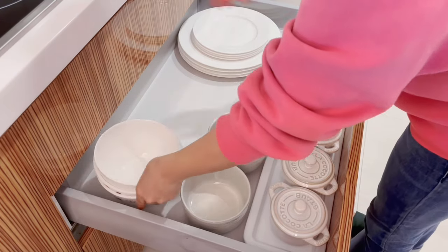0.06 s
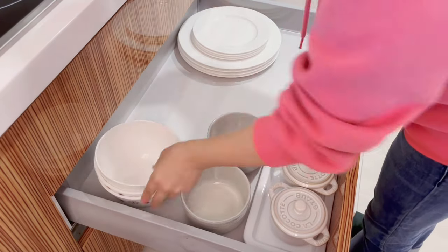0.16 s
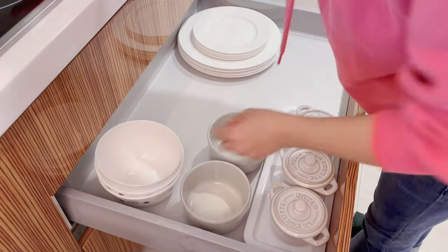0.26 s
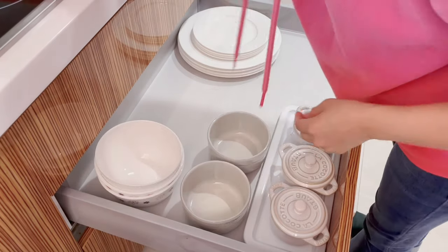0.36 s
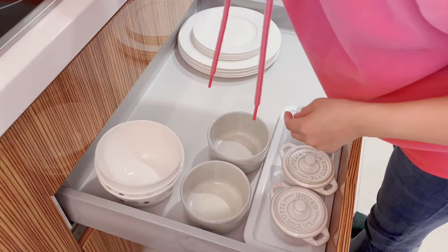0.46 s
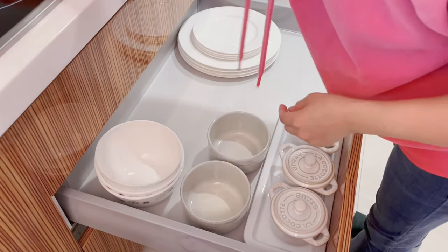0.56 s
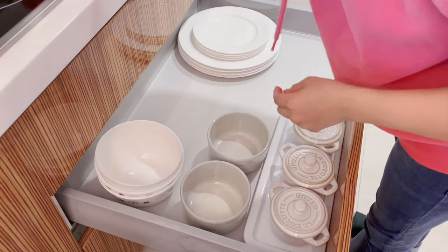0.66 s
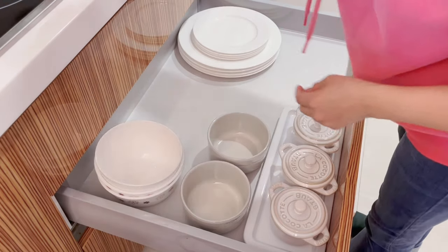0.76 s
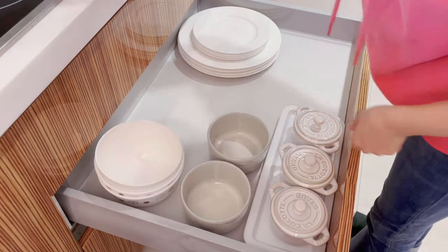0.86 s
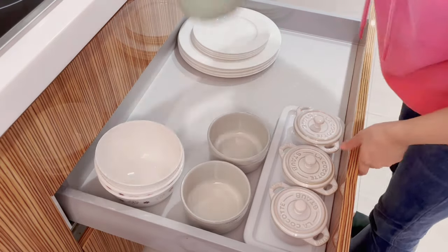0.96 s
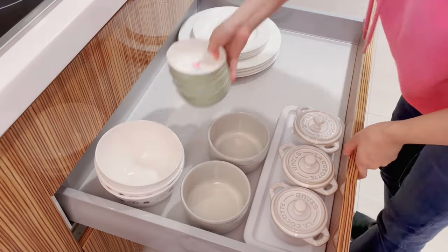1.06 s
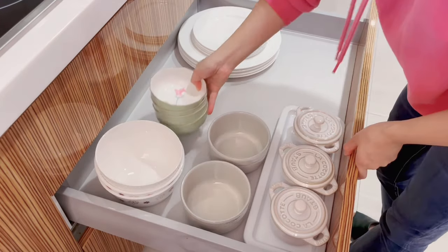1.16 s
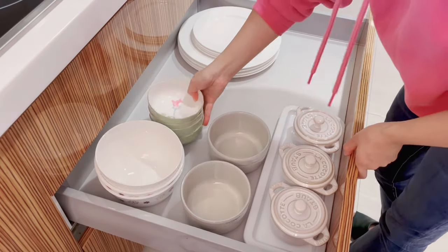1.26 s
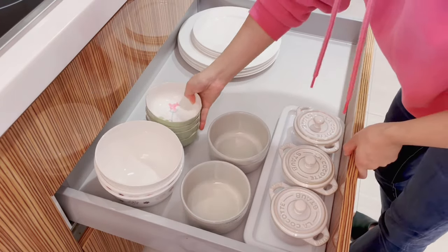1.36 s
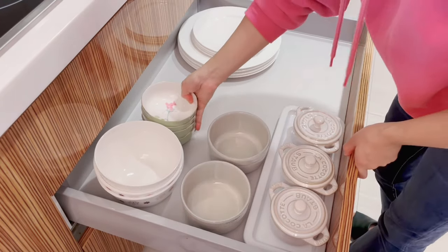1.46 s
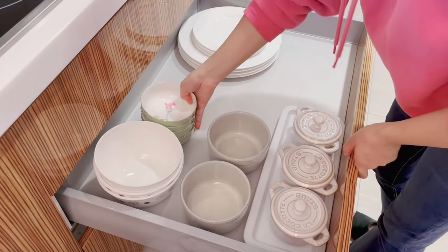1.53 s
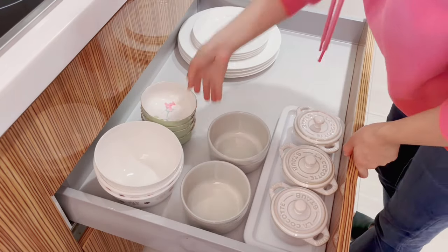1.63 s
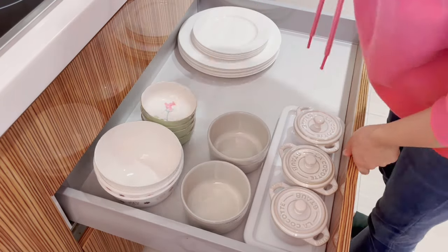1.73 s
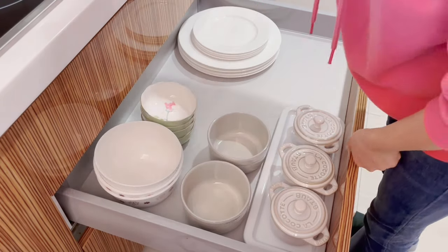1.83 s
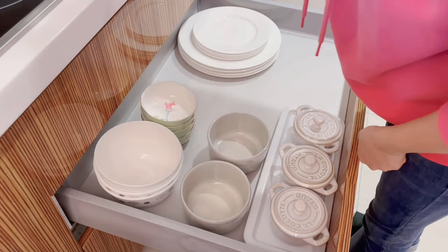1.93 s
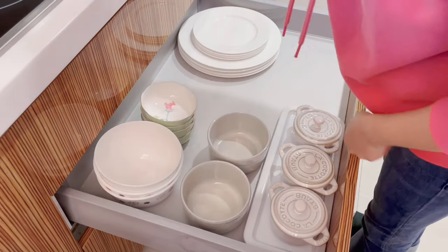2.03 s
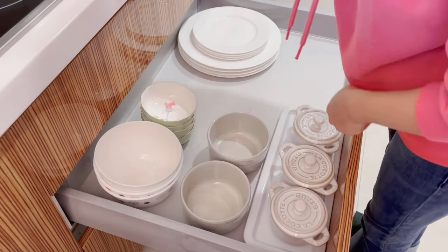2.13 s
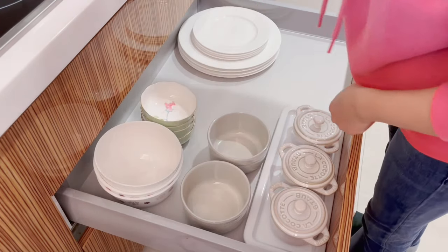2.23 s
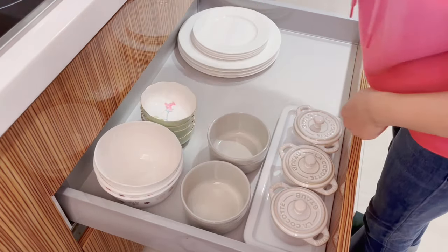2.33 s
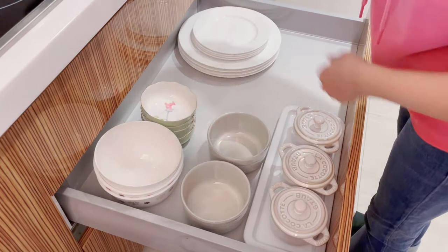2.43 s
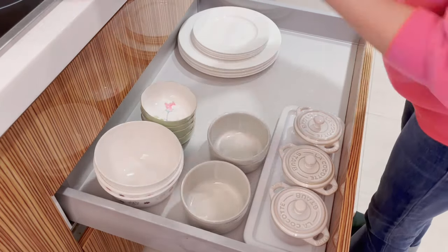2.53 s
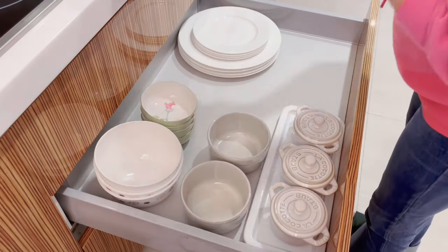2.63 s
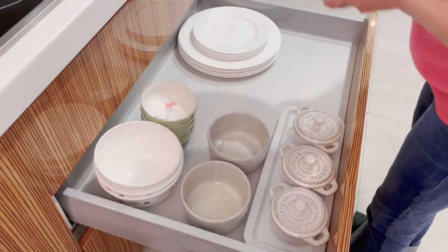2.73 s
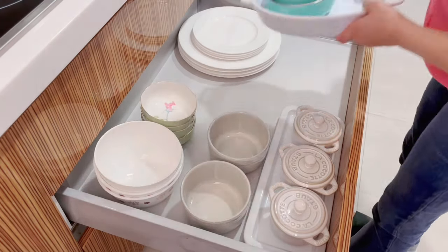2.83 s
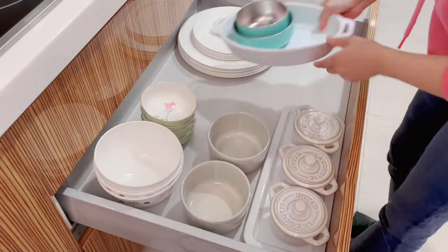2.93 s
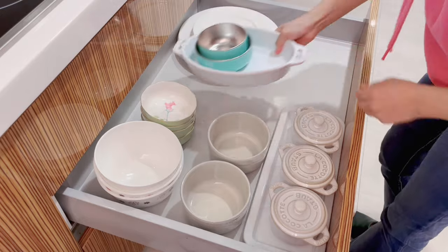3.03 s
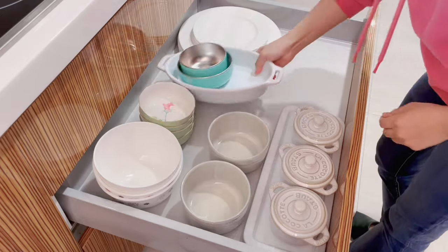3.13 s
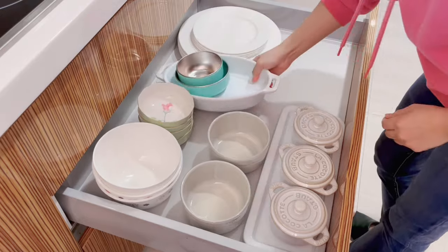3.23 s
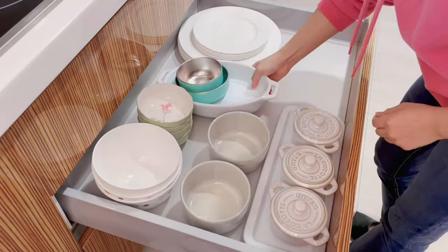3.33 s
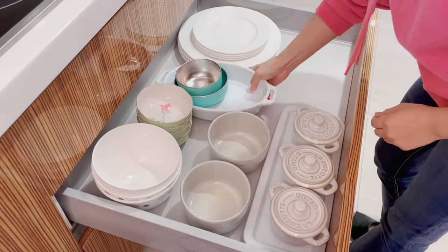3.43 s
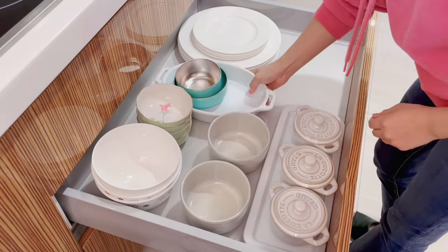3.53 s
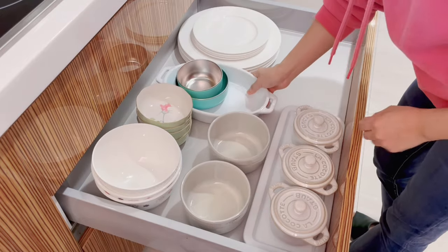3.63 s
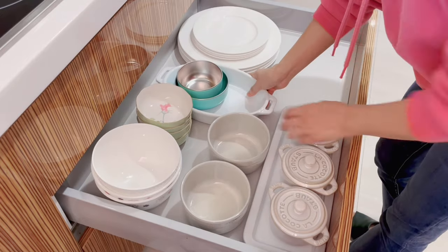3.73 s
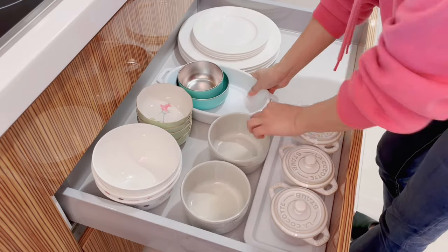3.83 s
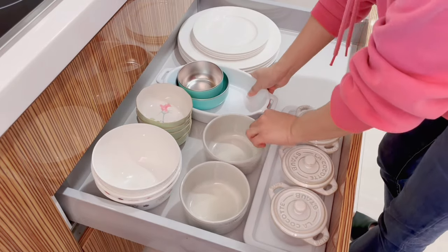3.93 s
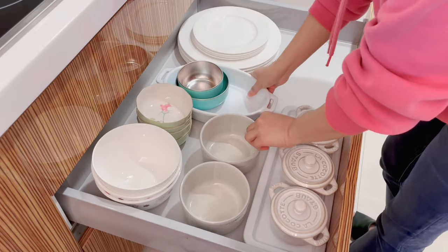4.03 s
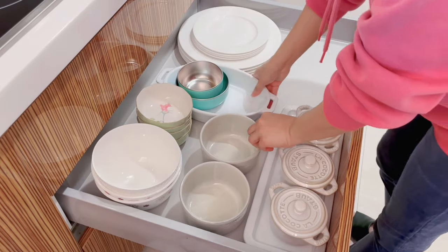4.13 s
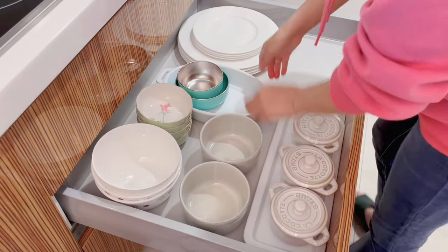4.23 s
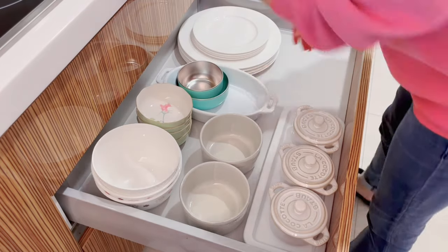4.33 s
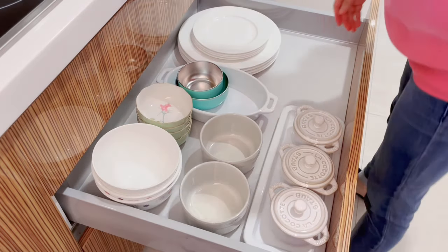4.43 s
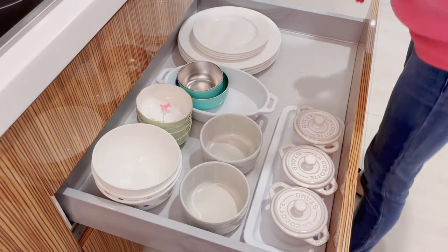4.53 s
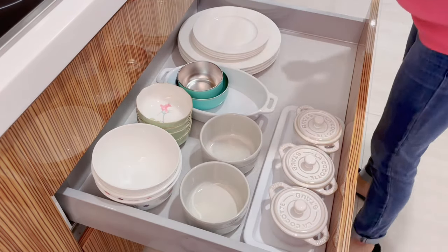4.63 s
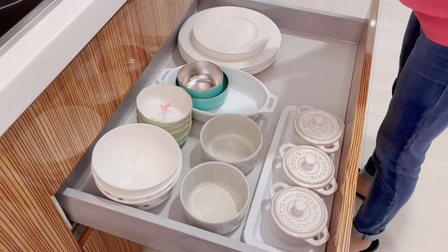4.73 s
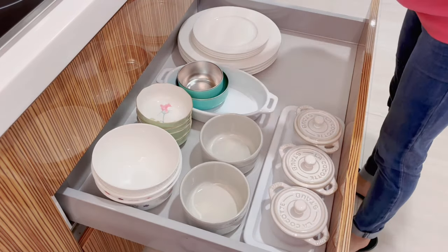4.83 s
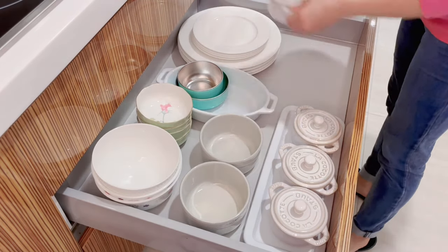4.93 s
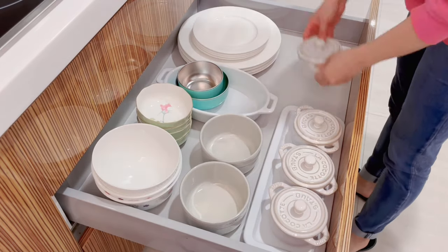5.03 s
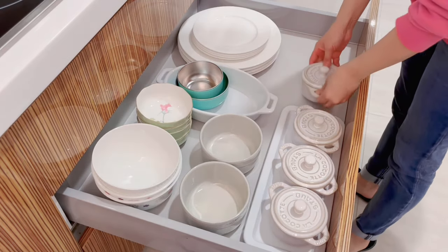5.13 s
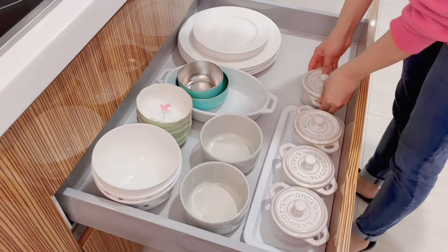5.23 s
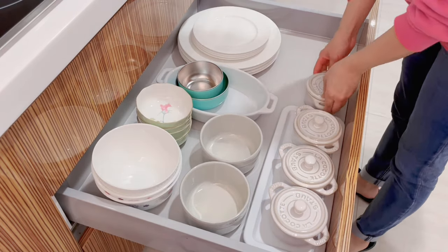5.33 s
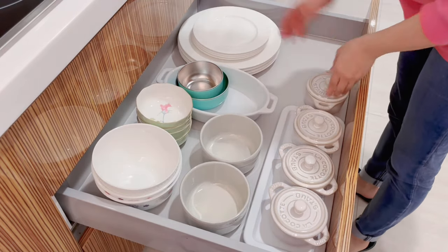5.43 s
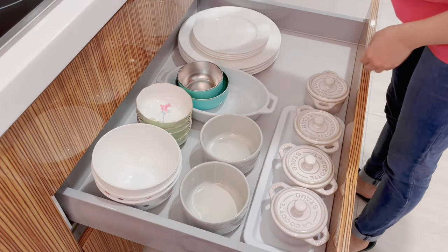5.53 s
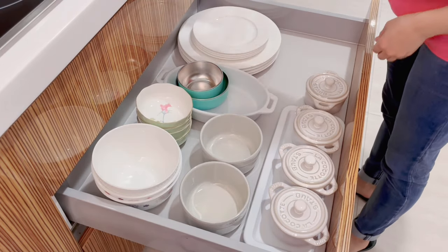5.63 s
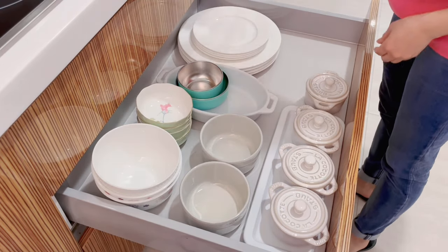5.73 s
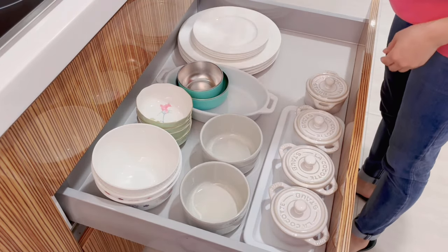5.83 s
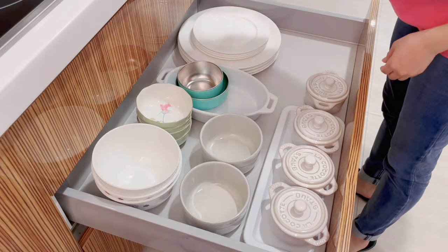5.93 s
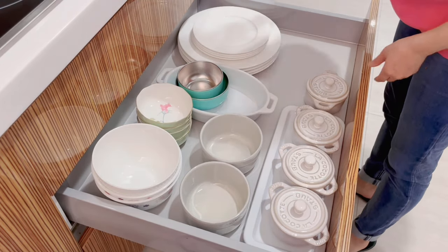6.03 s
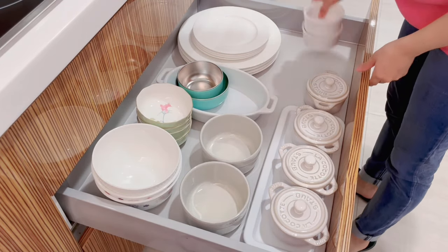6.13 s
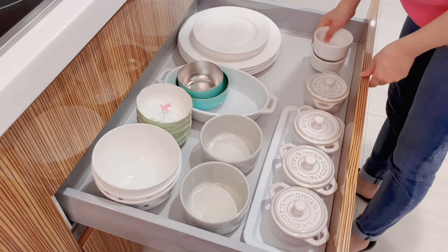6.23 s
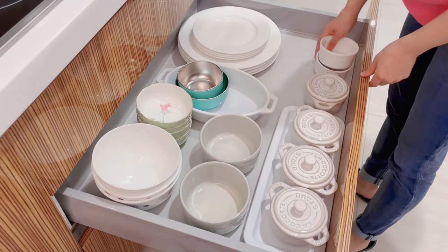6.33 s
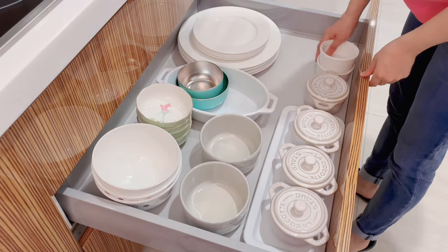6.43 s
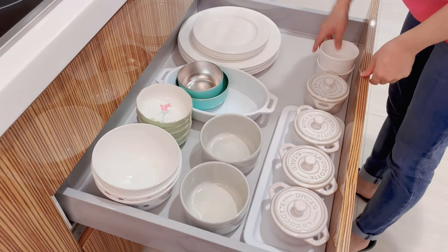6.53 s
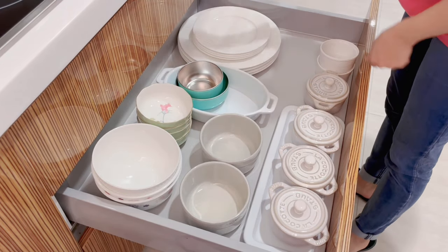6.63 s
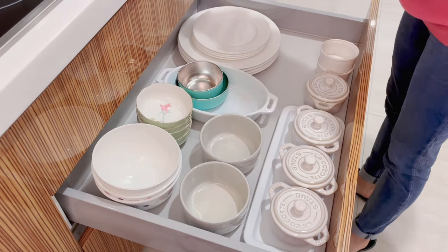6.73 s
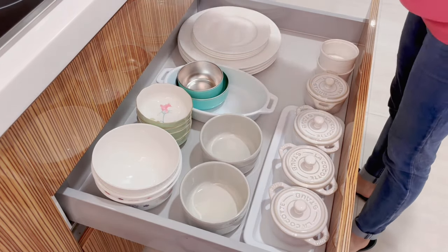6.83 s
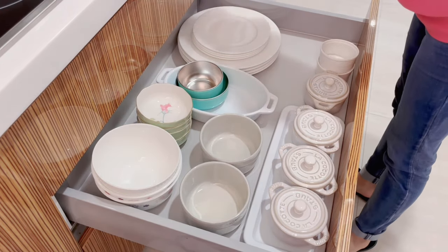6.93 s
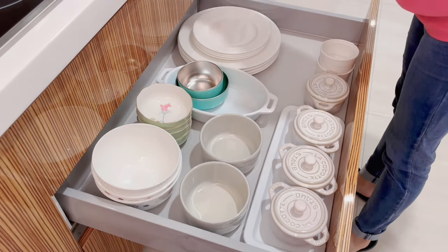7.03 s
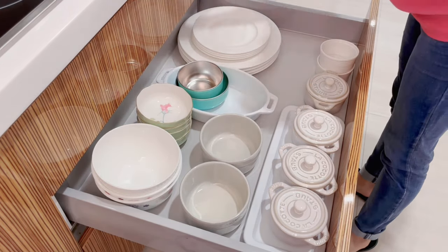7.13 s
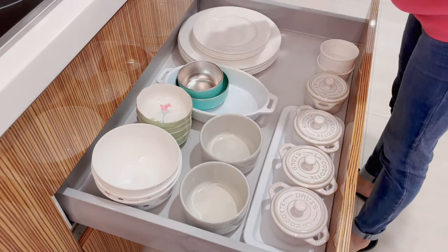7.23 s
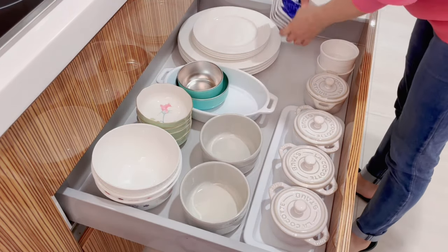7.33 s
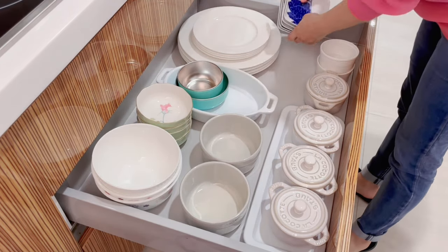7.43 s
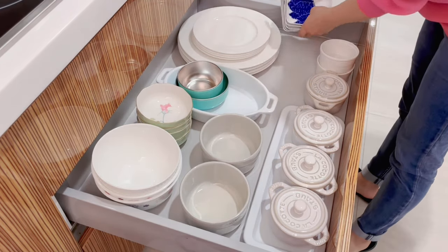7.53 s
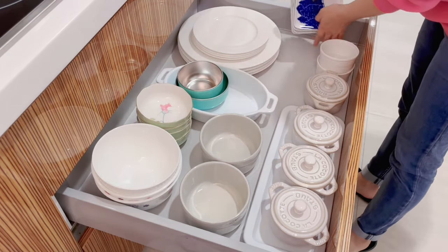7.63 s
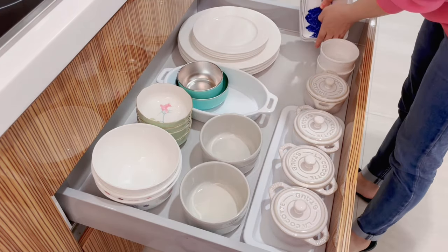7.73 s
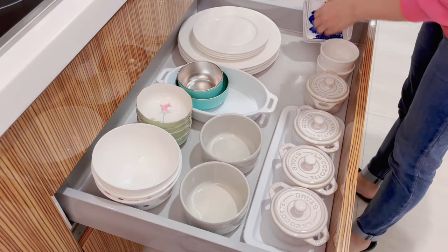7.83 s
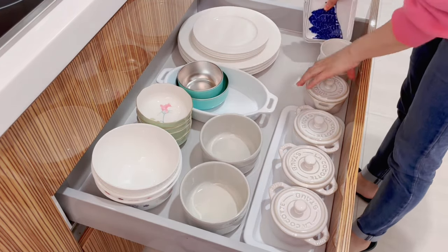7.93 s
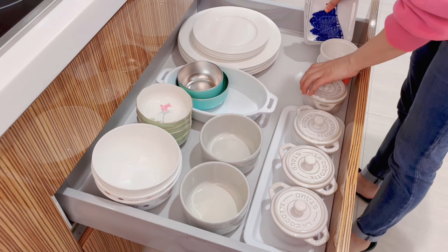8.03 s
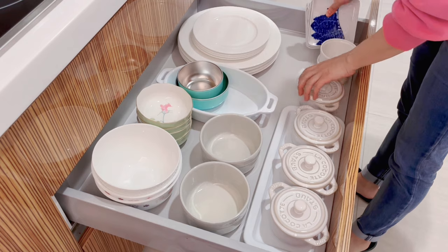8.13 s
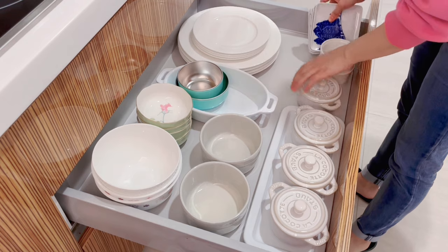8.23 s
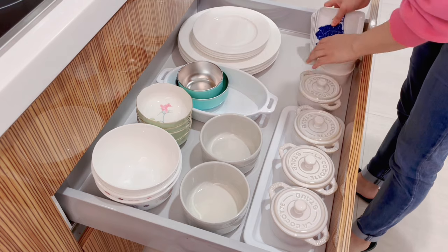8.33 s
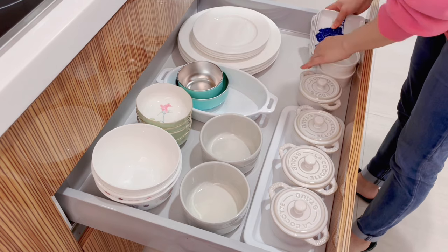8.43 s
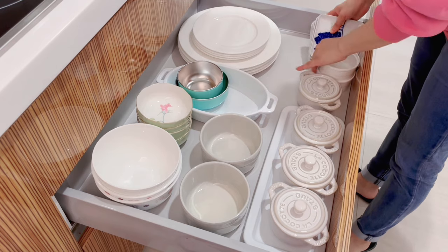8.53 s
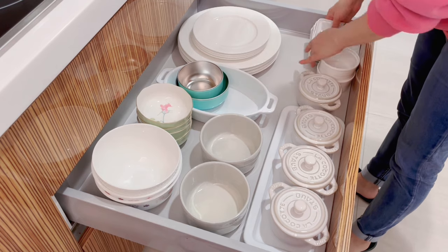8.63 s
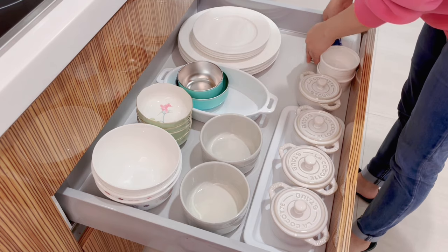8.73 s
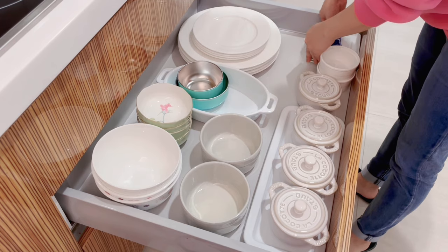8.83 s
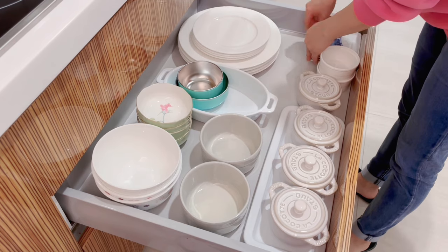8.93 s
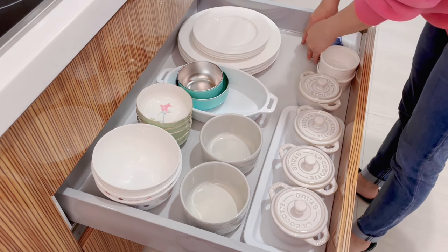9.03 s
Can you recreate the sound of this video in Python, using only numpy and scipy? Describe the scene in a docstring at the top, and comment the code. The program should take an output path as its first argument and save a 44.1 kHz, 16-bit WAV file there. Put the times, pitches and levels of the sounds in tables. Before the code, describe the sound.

Close stereo pickup in a quiet kitchen. Soft drawer-runner bumps and scuffs come first, then a hard thud of stacked bowls, a clattering baking dish with nested bowls against plates, small pots, ramekins, and finally a busy cluster of clinks and scrapes as square dishes are squeezed in. Pauses hold light taps, fabric rustle and a low hum.

```python
"""A faint tone with a soft rush fades after 1.5 s, while dishes are set into a wide kitchen drawer.
Blows come from runners, bowls, baking dish, plates, nested bowls, small pots, lids, ramekins, lids, square dishes.
Each blow is a short noise crack, then a boom of drawer and kitchen, both filtered by drawer and dish modes.
In between: scrapes made of random slips, sleeve rustles, light taps, sliding fingers and a singing steel bowl.
Still air and a low hum run throughout."""
import sys
import numpy as np
from scipy import signal
from scipy.fft import rfft, irfft
from scipy.io import wavfile
from scipy.ndimage import uniform_filter1d

SR = 44100
rng = np.random.default_rng(int(sys.argv[2]) if len(sys.argv) > 2 else 0)


def pcm_store(signal):
    """Save signal as 16-bit PCM."""
    levels = np.round(np.clip(np.atleast_2d(signal), -1, 1) * 32767)
    wavfile.write(sys.argv[1], SR, levels.astype(np.int16).T)


N = 399987
SIZE = 16384  # samples in one blow or scrape
HZ = np.fft.rfftfreq(SIZE, 1 / SR)
T = np.arange(SIZE) / SR

# resonances of what is handled: (frequency [Hz], full width [Hz], height before the ring level [dB])
BOWLS = [(938, 125, 9.6), (1640, 130, 6.1), (1990, 98, 5.8), (2750, 66, 3), (10900, 1400, 7),
         (13328, 179, 7.6)]
BAKING_DISH = [(586, 17, 3.9), (874, 130, 9.1), (1170, 160, 9), (1579, 200, 6.7), (3630, 66, 5),
               (6075, 190, 6)]
PLATE_STACK = [(880, 35, 7), (1931, 48, 5.3), (3522, 319, 7.5), (4249, 130, 10), (4570, 430, 5)]
SMALL_POTS = [(899, 22, 11.4), (1139, 59, 7), (1640, 150, 7.2), (2010, 270, 4.5), (2635, 330, 6.6),
              (5140, 44, 6.7), (6100, 85, 4)]
SQUARE_DISH = [(1130, 40, 11.3), (1820, 145, 6.6), (2320, 280, 8.5), (2700, 250, 7.8), (5603, 710, 14.7),
               (12750, 110, 28)]
LIDS = [(2590, 480, 8.5), (5620, 900, 8), (7900, 1030, 8)]
RAMEKINS = [(513, 43, 5.4), (688, 68, 2.8), (880, 49.3, 8.2), (1021, 26, 6.7), (2180, 85, 5.8),
            (2820, 250, 5.8), (4456, 790, 3.3), (6050, 390, 4.2), (9030, 520, 11), (12700, 1000, 12.7)]
NESTED_BOWLS = [(531, 30, 9), (1000, 67, 6.7), (1300, 149, 6.6), (1580, 181, 3.7), (3030, 710, 5),
                (4300, 420, 7.1), (5200, 200, 4.2), (6676, 88, 24.6), (8500, 477, 11), (11600, 240, 20)]
POT_RIM = [(1390, 67, 8), (2000, 220, 11.4), (6470, 248, 7.2), (10100, 530, 8.3), (12558, 659, 6.8)]
POT_LID = [(2210, 350, 5.9), (3850, 270, 10.5), (5288, 428, 7.5), (10471, 210, 15.4)]
DISH_ON_POT = [(520, 36, 5.7), (840, 29, 3.6), (1154, 45, 5), (1934, 81, 3.6), (7900, 1140, 9),
               (12300, 130, 8.2)]
DISH_ON_RAMEKINS = [(1013, 85, 5.7), (1290, 30, 6.2), (1676, 30, 4.3), (2520, 281, 6.5), (5500, 171, 14),
                    (7500, 240, 17), (9140, 1300, 10.4), (10760, 130, 11), (12500, 170, 14.6)]
LOOSE_LID = [(1730, 250, 7.7), (2520, 370, 4.1), (6370, 230, 8.4), (9400, 500, 7.8), (12030, 300, 18),
             (13550, 290, 26.5)]
RUNNERS = [(1230, 66, 22), (1606, 12, 23), (2740, 99, 7)]
# colour of a soft swish: (frequency [Hz], relative level [dB])
SWISH_LOW = [(100, -35.5), (250, 2.5), (600, 4), (1500, 2), (2600, 0), (4500, -12), (9000, -28.5)]


def dishes():
    """Dishes meet the drawer floor or each other; lighter taps, as a hand brushes them, lie between."""
    # blows: (time [s], strength [dB], weight on the drawer [dB], hardness of contact [dB per octave])
    blows = [(0.147, -5.5, 3.5, -7), (0.463, -18, 19, -1), (0.476, -12, 13, -4.5), (1.291, 26, -6.5, -11),
             (1.362, 2.5, 4, -4), (1.374, 15.5, -6.5, -10.5), (2.321, -7.5, -3, -8.5), (2.343, -4, -1, -1),
             (2.352, -3.5, -6, -3.5), (2.375, -7, -9, -15), (3.127, 11.5, 6, -2), (3.1834, 17, 2, -0.5),
             (3.188, 0, 22.5, 3.5), (3.199, 11.5, 3, -7), (3.209, 11, -1, -2), (3.3685, 25.5, 3.5, -7.5),
             (3.461, 10, 5, -10), (3.647, 7.5, 4.5, -9), (3.6929, 12, 2.5, -13.5), (3.94, 15.5, 2.5, -8),
             (3.944, 15, -3, -8), (5.2343, 15, 8, -6.5), (5.276, 15, 8, -9), (5.694, -9, 1, -5.5),
             (5.723, -8, 11.5, -2), (6.3453, 24, 0.5, -6.5), (6.393, 14, -5, -6), (6.4527, 8.5, -2, -6.5),
             (6.848, -8.5, 7.5, -5.5), (6.881, -5.5, 8, -5.5), (7.691, 4, 0.5, -13), (7.744, 12, 3, -6.5),
             (7.9967, 1, 5, -1.5), (8.0215, 12.5, -1.5, -6), (8.0882, 10, -11, -3.5), (8.101, 1, 5, -10),
             (8.173, -10, 11, -4.5), (8.334, 15, -11, -4), (8.389, 13.5, -9.5, -6.5), (8.451, 9, -7, -10.5),
             (8.473, 11, 1, -9.5), (8.489, 17, -5.5, -6.5), (8.5205, 22.5, -8, -5.5),
             (8.598, 9, -3.5, -4.5), (8.609, 5.5, -2, -4.5), (8.659, 8, -8, -5), (8.67, 5.5, 8, -4.5),
             (8.7606, 23, 8.5, -5.5), (8.781, 1.5, -7, 0.5), (8.93, 11.5, -9, -13), (8.946, 7, 7.5, -5.5)]
    # light ticks of crockery: (time [s], strength [dB])
    taps = [(2.8, -19), (2.88, -17.5), (4.51, -21.5), (4.709, -16), (4.728, -6.5), (5.035, -8),
            (6.998, -13), (7.009, -12), (7.202, -6), (7.305, -16), (7.384, -14.5), (7.446, -11),
            (7.474, -21)]
    # a tap is too light and brief to move the drawer: (frequency [Hz], relative level [dB])
    tap_colour = [(200, -18), (500, -16.5), (1200, -5.5), (3200, -3), (7000, -6), (10000, -11),
                  (14000, -16.5)]
    out = np.zeros((2, N))
    for s, strength_db, weight_db, hardness_db in blows:
        _, _, thump_db, _, _ = in_hand(s)
        add(out, s, blow(s, strength_db, force(weight_db, hardness_db, thump_db)))
    for s, strength_db in taps:
        add(out, s, blow(s, strength_db, read(tap_colour, HZ)))
    return out


def blow(s, strength_db, colour_db, rise_s=0.0002, swell_s=0.00047, crack_low_hz=420,
         lag=1.0, lean_db=2.0, vary_db=6.0):
    """One contact: a crack and the boom that it starts, both ringing in the modes of drawer and dish."""
    # drawer resonances: (frequency [Hz], full width [Hz], height before the drawer ring level [dB])
    drawer = [(150, 13, 6), (255, 41, 3), (408.8, 11, 15.5), (521, 22, 3.5), (670, 11, 0), (793, 33, 8),
              (945, 20, 7.5), (1137, 36, 6), (1365, 5.6, 1.5), (1550, 20, 2.5)]
    # colour common to all contacts: (frequency [Hz], relative level [dB])
    contact = [(40, -30), (90, -22.5), (130, -7), (195, -10), (260, -5), (350, -10.5), (420, -5.5),
               (650, -4), (1000, -3.5), (2000, 2), (4000, 2), (7000, 0.5), (13000, -0.5), (14500, -11.5),
               (16000, -23)]
    # boom against crack at strength 0 dB; its fall per dB of strength; no more boom below lightest_db
    boom_db, boom_fall, lightest_db = 2.5, 0.24, -4
    dish, ring_db, _, drawer_db, crack_s = in_hand(s)

    burst = np.exp(-T / crack_s) * (1 - np.exp(-T / rise_s))
    crack_noise = noise(SIZE, [(300, 1.0), (1100, 0.83), (3000, 1.0)], lag=lag)
    crack = flattened(crack_noise * burst, size=110)
    quick = (1j * HZ / (crack_low_hz + 1j * HZ)) ** 2  # bass builds up too slowly to be in the crack

    tail = flattened(boom() * (1 - np.exp(-T / swell_s)), size=40)
    share = amp(boom_db - boom_fall * max(strength_db, lightest_db))  # a light blow is mostly boom
    mixed = (quick * crack + share * tail) / np.hypot(abs(quick), share)
    z = flattened(irfft(mixed), size=110)

    favoured_db = vary_db * rng.uniform(-1, 1, (len(dish), 1))  # each contact drives the modes differently
    resonance = np.sqrt(1 + peaks(drawer, drawer_db) + peaks(dish, ring_db + favoured_db))
    strength = amp(strength_db + colour_db + read(contact, HZ))
    lean = amp(np.outer([.5, -.5], lean_db * read([(550, 0.2), (1000, 1.0)], HZ)))  # treble leans left
    return irfft(z * causal(strength * resonance * spot()) * lean)


def in_hand(s):
    """The dish or runners at time s: modes, ring, thump, ring of the drawer floor there, and crack."""
    # low ring: tight grip; high thump: heavy load; crack is the time constant of the noise burst
    # (from [s], resonances, ring [dB], thump [dB], drawer ring [dB], crack [s])
    handled = [(0, RUNNERS, -28, 5, -13, 0.0071), (1, BOWLS, -2, -3, -1.5, 0.0024),
               (1.9, RUNNERS, -2.5, -5, 2.5, 0.0037), (3, BAKING_DISH, 1.5, -0.5, -2, 0.0025),
               (3.17, PLATE_STACK, -0.5, -3, 4, 0.0027), (3.3, BAKING_DISH, -3.5, -5, -3, 0.0025),
               (3.6, NESTED_BOWLS, 4, -8, 3.5, 0.0089), (4.4, LOOSE_LID, 1, -19.5, 12, 0.0062),
               (5.15, SMALL_POTS, -1, -18, 1, 0.0045), (5.6, LIDS, 2.5, -0.5, -5, 0.0062),
               (6.2, RAMEKINS, -2, -18, -1, 0.0046), (6.7, LIDS, -1, 4, -3.5, 0.0068),
               (7.6, SQUARE_DISH, 0, -9.5, -5.5, 0.0047), (7.95, POT_RIM, -1, -17, -3.5, 0.0037),
               (8.08, POT_LID, -2, -12, -0.5, 0.0011), (8.3, DISH_ON_POT, -0.5, -10, -2, 0.0052),
               (8.72, DISH_ON_RAMEKINS, 0, -15.5, -6, 0.0058)]
    return [row[1:] for row in handled if row[0] <= s][-1]


def force(weight_db, hardness_db, thump_db):
    """Spectrum of a blow [dB]: weight pushes the drawer, a heavy load thumps deeper, hardness adds treble."""
    thump_hz, knock_hz, clack_hz, tick_hz = 202, 484, 1130, 10400
    knock = read([(knock_hz, 1), (clack_hz, 0)], HZ)
    thump = read([(thump_hz, 1), (knock_hz, 0)], HZ)
    octaves = np.log2(np.clip(HZ, clack_hz, tick_hz) / clack_hz)
    return weight_db * knock + thump_db * thump + hardness_db * octaves


def boom(late_db=-28, late_t60=0.75, air_hz=22000):
    """The dense ring of drawer and cabinet, with the fainter, longer tail of the kitchen."""
    # early fading: (frequency [Hz], t60 [s])
    early_t60 = [(150, 0.25), (400, 0.11), (1100, 0.21), (3000, 0.2), (7000, 0.21), (13000, 0.16)]
    hz, t, z = signal.stft(noise(SIZE), SR, nperseg=256)
    hz = hz[:, None]
    early = amp(-60 * t / read(early_t60, hz))
    late = amp(late_db - 60 * t / late_t60 * (1 + hz / air_hz))  # treble fades faster
    return signal.istft(z * np.hypot(early, late), SR, nperseg=256)[1][:, :SIZE]


def peaks(modes, db=0):
    """Power that a set of resonances adds at each frequency."""
    hz, width, height_db = np.transpose(modes)[:, :, None]
    return (amp(height_db + db) ** 2 / (1 + (2 * (HZ - hz) / width) ** 2)).sum(0)


def spot(patchy_db=4.5, fine_db=2.0, full_hz=3500):
    """Each point of contact favours its own modes: broad clusters and single narrow ones."""
    clusters, singles = rng.standard_normal((2, len(HZ)))
    clusters = evened(uniform_filter1d(uniform_filter1d(clusters, size=130), size=60))
    singles = evened(uniform_filter1d(uniform_filter1d(singles, size=12), size=8))
    pattern_db = patchy_db * np.clip(clusters, -2.5, 1.2) + fine_db * singles
    gain = amp(np.minimum(HZ / full_hz, 1) * pattern_db)
    return gain / np.sqrt(uniform_filter1d(gain ** 2, size=700))


def flattened(x, size):
    """Spectrum of a stereo burst, levelled over size bins: the blow sets the colour, not chance."""
    z = rfft(x)
    power = uniform_filter1d((abs(z) ** 2).mean(0), size=size)
    return z * causal(1 / np.sqrt(abs(power)))


def causal(gain):
    """The minimum-phase response with this gain: it never sounds before its cause."""
    log_gain = np.log(np.r_[gain, gain[-2:0:-1]] + 1e-9)
    return np.exp(np.conj(signal.hilbert(log_gain)))[:len(gain)]


def steel_bowl():
    """A steel bowl in the baking dish sings on when shaken: one thin, long mode as a decaying sine."""
    # shakes: (time [s], peak level [dB])
    shakes = [(3.37, -70), (3.94, -65), (6.345, -68)]
    steel_hz, steel_t60_s = 2900, 2.2
    t = np.arange(N) / SR
    out = np.zeros((2, N))
    for s, db in shakes:
        cycles = steel_hz * t + .5 * rng.random((2, 1))
        add(out, s, amp(db - 60 * t / steel_t60_s) * np.sin(2 * np.pi * cycles))
    return out


def scrapes(wet_db=-15, grip_s=0.0097, ring_s=0.0023, dish_db=-5, count=8):
    """An unglazed foot catches and slips; each slip is a tiny blow at one of several points of the floor."""
    # dishes dragged over the floor, or the drawer nudged on its runners: (from [s], to [s], level [dB])
    drags = [(0.435, 0.487, -48), (0.503, 0.556, -51), (0.566, 0.631, -49), (2.06, 2.132, -49),
             (2.222, 2.305, -48.5), (3.903, 3.979, -37.5), (5.299, 5.373, -43), (6.846, 6.926, -50),
             (7.706, 7.74, -47), (8.131, 8.205, -38.5), (8.35, 8.435, -38), (8.44, 8.49, -33.5),
             (8.583, 8.685, -39.5), (8.725, 8.77, -33), (8.955, 9.044, -47)]
    # grain of one slip: (frequency [Hz], relative level [dB])
    grit = [(120, -37), (300, -2.5), (520, 3.5), (1000, 6), (1900, 3), (3200, -7), (8000, -23),
            (13000, -27), (15500, -37)]
    slips_per_s, slip_spread_db = 260, 6
    out = np.zeros((2, N))
    points = []
    for _ in range(count):
        knock = noise(SIZE) * np.exp(-T / ring_s) + amp(wet_db) * boom()
        points.append(rfft(knock) * causal(amp(read(grit, HZ)) * spot()))
    for start, end, db in drags:
        length = end - start
        slips = (rng.random(SIZE) < slips_per_s / SR) * (T < length) * rng.choice([-1, 1], SIZE)
        slips = slips * amp(slip_spread_db * np.minimum(rng.exponential(1, SIZE), 2.5))
        slips = slips * (1 - np.exp(-T / grip_s))  # the push builds up
        where = rng.integers(0, count, SIZE)
        grind = sum(rfft(slips * (where == k)) * point for k, point in enumerate(points))
        sound = irfft(grind * causal(np.sqrt(3.0 + peaks(in_hand(start)[0], dish_db))))
        # the level is the rms with all energy counted over the drag's own length
        add(out, start, amp(db) * evened(sound) * np.sqrt(length * SR / SIZE))
    return out


def clothes():
    """Each stroke of a sleeve or hand has a soft swish and a finer hiss of shaped noise."""
    # strokes: (middle [s], half length [s], swish level [dB], hiss level [dB])
    rustles = [(0.01, 0.09, -50.5, -82), (0.467, 0.079, -54.5, -68.5), (0.603, 0.037, -48.5, -52.5),
               (2.083, 0.066, -49, -49), (2.269, 0.046, -50, -48.5), (4.488, 0.17, -66, -64),
               (5.741, 0.031, -48, -56), (5.84, 0.036, -50, -52.5), (6.974, 0.014, -50.5, -55.5),
               (7.355, 0.051, -67, -56.5), (8.902, 0.026, -41.5, -42.5)]
    # colour of the hiss: (frequency [Hz], relative level [dB])
    swish_high = [(1200, -18), (3000, -2), (6000, -7.5), (9000, -17), (14000, -36), (16000, -45)]
    middle, half, swish_db, hiss_db = np.transpose(rustles)
    swish = strokes(middle, half, swish_db) * cloth(SWISH_LOW)
    hiss = strokes(middle, half, hiss_db) * cloth(swish_high)
    return swish + hiss


def cloth(colour, patchy_db=3.5, flicker_db=1.5):
    """The noise of rubbing fabric: its colour shifts in patches, and it flickers as folds catch."""
    z = signal.stft(noise(N, colour=colour), SR, nperseg=512)[2]
    patches = uniform_filter1d(rng.standard_normal(z.shape[1:]), size=5, axis=0)
    patches = evened(uniform_filter1d(patches, size=7, axis=1))
    flicker = rng.standard_normal(z.shape[2])
    z = z * amp(patchy_db * patches + flicker_db * flicker)
    return evened(signal.istft(z, SR, nperseg=512)[1][:, :N])


def fingers():
    """Dry skin sliding off glaze gives a thin, bright hiss."""
    # slides: (middle [s], half length [s], level [dB])
    slides = [(4.22, 0.068, -57.5), (4.598, 0.041, -60.5)]
    # colour of skin on glaze: (frequency [Hz], relative level [dB])
    skin = [(2000, -14.5), (4500, -5.5), (8000, -1.5), (11000, -8.5), (14000, -8), (15500, -35)]
    return strokes(*np.transpose(slides)) * noise(N, colour=skin)


def strokes(middle, half, db):
    """Gain of a set of strokes, each a Gaussian swell around its middle."""
    from_middle = (np.arange(N)[:, None] / SR - middle) / half
    return np.exp(-np.minimum(from_middle ** 2 / 2, 20)) @ amp(db)


def kitchen(still_db=-58, hum_db=-60, low_hum_db=-70):
    """Still air as coloured noise, a low hum, and a faint tone with a soft rush that dies away."""
    # colour of the still air: (frequency [Hz], relative level [dB])
    still = [(25, -30), (50, -20), (62, -17), (85, -6), (125, -3), (190, -9), (400, -12), (1000, -19),
             (2500, -27), (5000, -34), (10000, -48), (16000, -60)]
    tone_db, rush_db, tone_end_s, tone_fade_db_per_s = -62, -63.5, 1.5, 60
    fade = amp(-tone_fade_db_per_s * np.maximum(np.arange(N) / SR - tone_end_s, 0))
    tone = amp(tone_db) * waver(hz=407.0, width_hz=3.7)
    rush = amp(rush_db) * noise(N, colour=SWISH_LOW)
    hum = amp(hum_db) * waver(hz=119.6, width_hz=6.9)
    low_hum = amp(low_hum_db) * waver(hz=81, width_hz=1.8)
    return amp(still_db) * noise(N, colour=still) + hum + low_hum + fade * (tone + rush)


def waver(hz, width_hz):
    """A wavering mono tone of rms 1: noise in a narrow band."""
    f = np.fft.rfftfreq(N, 1 / SR)
    return evened(irfft(rfft(rng.standard_normal(N)) / (1 + ((f - hz) / width_hz) ** 2), N))


def noise(size, likeness=None, colour=((1, 0), (2, 0)), lag=0):
    """Stereo noise of rms 1 with a left-right likeness, a colour and a right-side delay in samples."""
    # default left-right likeness: (frequency [Hz], correlation [0-1])
    diffuse = [(60, 0.98), (150, 0.95), (330, 0.86), (640, 0.48), (1400, 0.046), (15000, 0.36)]
    hz = np.fft.rfftfreq(size, 1 / SR)
    left, other = rfft(rng.standard_normal((2, size)))
    same = np.clip(read(diffuse if likeness is None else likeness, hz), -1, 1)
    right = same * left + np.sqrt(1 - same ** 2) * other
    right = right * np.exp(-2j * np.pi * hz * lag / SR)
    return evened(irfft(np.array([left, right]) * amp(read(colour, hz)), size))


def amp(db):
    """Decibels to gain."""
    return 10 ** (np.asarray(db) / 20)


def evened(x):
    """Scales to rms 1."""
    return x / np.sqrt(np.mean(x ** 2) + 1e-20)


def read(points, hz):
    """Joins (Hz, value) points on a log-frequency axis."""
    f, value = np.transpose(points)
    return np.interp(np.log(hz + 1), np.log(f + 1), value)


def add(mix, s, sound):
    """Mixes a stereo sound in at time s."""
    part = mix[:, max(round(s * SR), 0):][:, :sound.shape[1]]
    part += sound[:, :part.shape[1]]


def scene():
    """Dishes, steel bowl, scrapes, clothes and fingers in the kitchen."""
    return dishes() + steel_bowl() + scrapes() + clothes() + fingers() + kitchen()


def record(dry, ceiling=0.99, edge_hz=16200):
    """The loudest peaks are rounded off; then a low-pass sets the band limit."""
    rounded = ceiling * np.tanh(dry / ceiling)
    low_pass = signal.firwin(511, edge_hz, window=("kaiser", 9), fs=SR)
    return signal.oaconvolve(rounded, low_pass[None], "same")


dry = scene()
out = record(dry)
pcm_store(out)
```